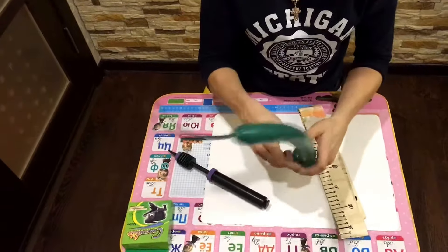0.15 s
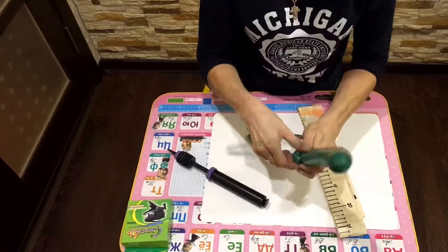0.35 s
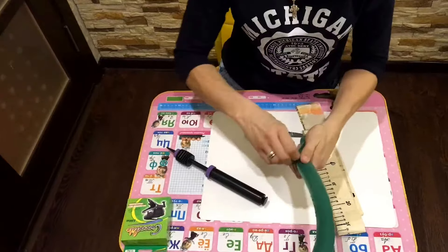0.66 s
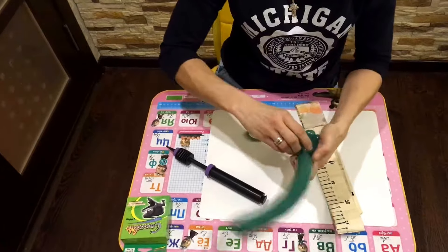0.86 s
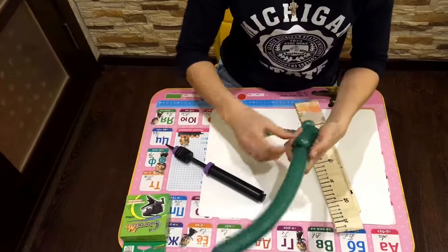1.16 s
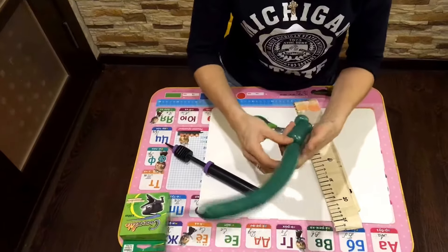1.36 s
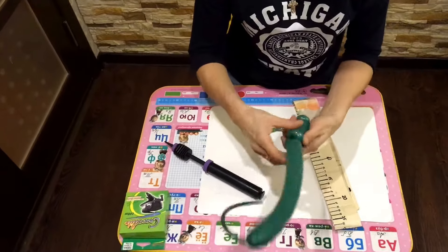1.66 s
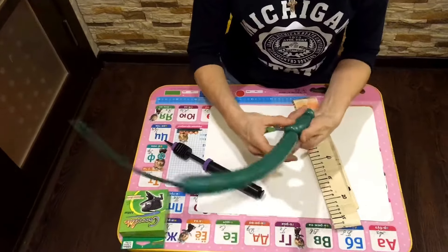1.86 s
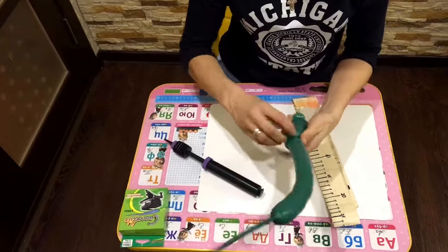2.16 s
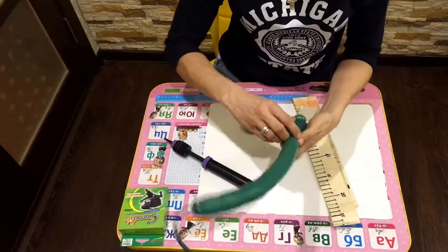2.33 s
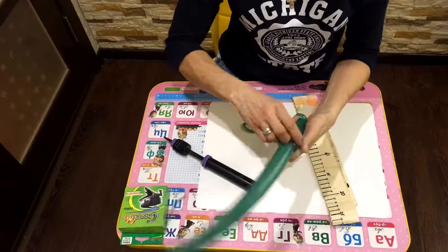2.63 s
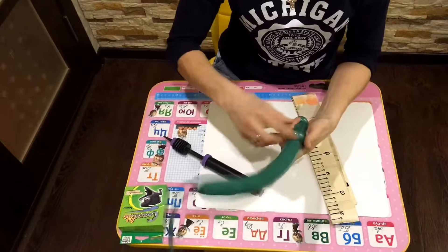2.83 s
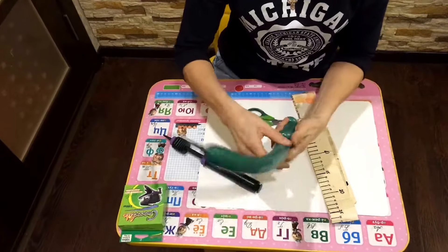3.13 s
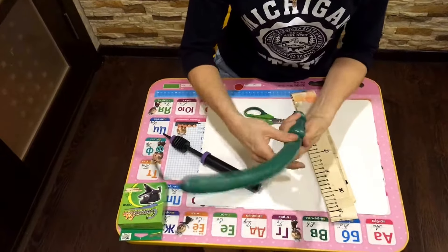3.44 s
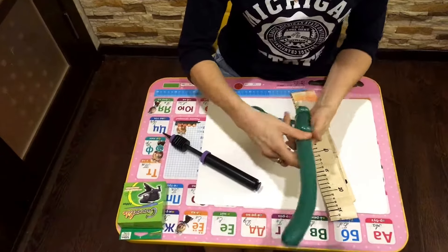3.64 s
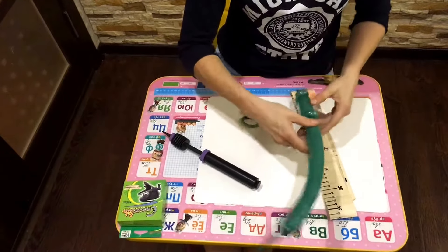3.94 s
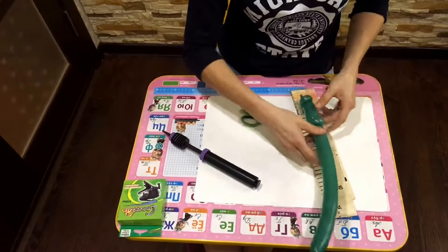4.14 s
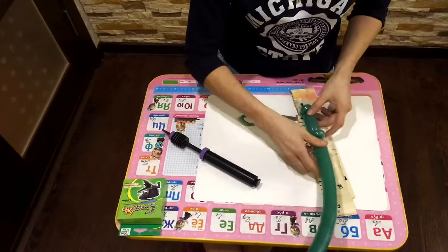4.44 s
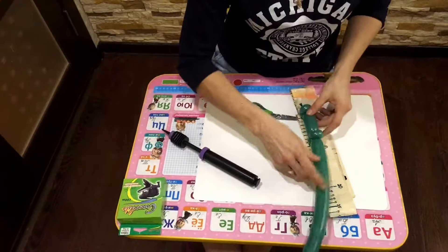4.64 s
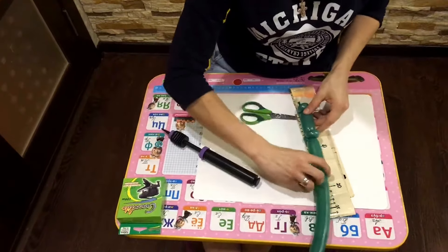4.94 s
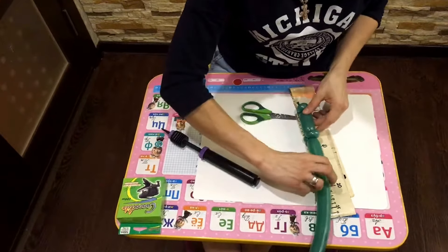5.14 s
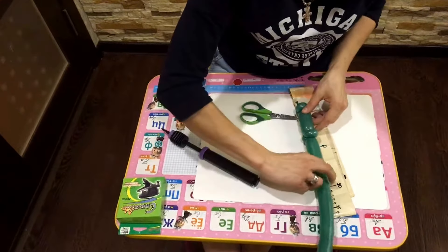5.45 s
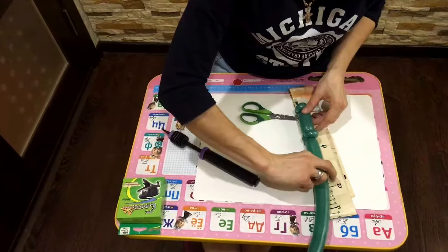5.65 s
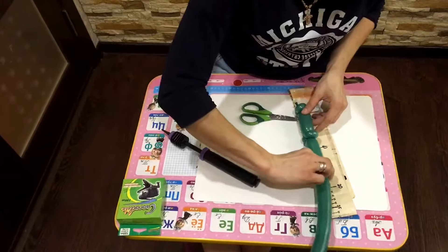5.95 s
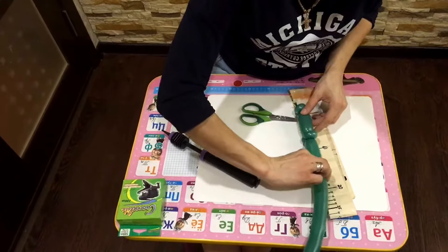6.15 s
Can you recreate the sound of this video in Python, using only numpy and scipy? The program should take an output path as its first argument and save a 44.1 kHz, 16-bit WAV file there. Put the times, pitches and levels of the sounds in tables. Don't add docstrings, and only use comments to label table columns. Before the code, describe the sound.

Close handling of an inflated rubber tube: uneven squeaky hiss, crisp latex snaps and small hollow pops, mixed with soft wooden thuds and a slight metallic ring. The first half is busy and sharp, with a rapid ratcheting creak before the middle. After about four seconds it becomes much quieter, with gentle finger strokes, little ticks and thin peeps near the end. Short indoor echo and low room murmur.

```python
import sys
import numpy as np
from scipy import signal
from scipy.fft import rfft, irfft
from scipy.io import wavfile
from scipy.ndimage import uniform_filter1d

SR = 44100
rng = np.random.default_rng(int(sys.argv[2]) if len(sys.argv) > 2 else 0)


def gain_from_decibels(decibels):
    exponent = np.asarray(decibels, float) / 20
    return 10 ** exponent


def wav_record(signal):
    frames = np.transpose(np.atleast_2d(signal))
    bounded = np.clip(frames, -1, 1)
    quanta = np.round(bounded * 32767).astype(np.int16)
    wavfile.write(sys.argv[1], SR, quanta)


N = 277389
ROOM_DB = -1


def rms_one(x):
    return x / np.sqrt(np.mean(x ** 2) + 1e-20)


def peak_one(x):
    return x / np.abs(x).max()


def in_time(rows):
    s, *columns = np.transpose(rows)
    return [np.interp(np.arange(N) / SR, s, c) for c in columns]


def coloured(x, spectrum):
    hz, db = np.transpose(spectrum)
    grid_hz = np.linspace(1, SR / 2, 2049)
    log_gain = np.interp(np.log(grid_hz), np.log(hz), db) * np.log(10) / 20
    cepstrum = irfft(log_gain)
    cepstrum[1:2048] *= 2
    cepstrum[2049:] = 0
    impulse = irfft(np.exp(rfft(cepstrum)))
    return signal.oaconvolve(x, impulse)[:len(x)]


def resonance(x, hz, width_hz):
    r = np.exp(-np.pi * width_hz / SR)
    top = np.array([1, 0, -1]) * (1 - r * r) / 2
    return signal.lfilter(top, [1, -2 * r * np.cos(2 * np.pi * hz / SR), r * r], x)


def drift(rate_hz):
    r = np.exp(-2 * np.pi * rate_hz / SR)
    return rms_one(signal.lfilter([1], [1, -2 * r, r * r], rng.standard_normal(N + SR))[SR:])


def burst(noise, rise_s, decay_s):
    t = np.arange(len(noise)) / SR
    return noise * (1 - np.exp(-t / rise_s)) * np.exp(-t / decay_s)


def add(out, s, piece):
    i = round(s * SR)
    out[i:i + len(piece)] += piece[:N - i]


def swells(s, db, rise_s, rest_db):
    out, t = np.full(N, float(rest_db)), np.arange(N) / SR
    fade_share = .9
    for at, top_db, rise in zip(s, db, np.maximum(rise_s, .01)):
        away_s = np.maximum(at - t, (t - at) / fade_share)
        out = np.maximum(out, top_db - 10 * away_s / rise)
    return out


def heard(piece, colour, wet_db):
    room_t60_s, treble_t60_s = 0.35, 0.16
    t = np.arange(round(.3 * SR)) / SR
    grit = signal.lfilter([.08], [1, -.96], rng.standard_normal(len(t)))
    scatter = rng.standard_normal(len(t)) * gain_from_decibels(6.7 * grit)
    low = signal.lfilter([.4], [1, -.6], scatter)
    echo = low * gain_from_decibels(-60 * t / room_t60_s) + (scatter - low) * gain_from_decibels(-60 * t / treble_t60_s)
    echo *= np.clip(t / 0.0026 - .5, 0, 1)
    wet = signal.fftconvolve(colour, echo)
    wet *= gain_from_decibels(wet_db) * np.linalg.norm(piece) / np.linalg.norm(wet)
    wet[:len(piece)] += piece
    return wet


# frequency in Hz, level in dB per Hz.
AIR = [(15, -65.5), (25, -25.5), (48, 3.5), (82, -11.5), (229, 0), (270, -37), (363, -16.5), (427, -20.5),
       (545, -44), (2840, -29), (16000, -25)]


def still_air():
    air_db = -71 - 1.0
    return gain_from_decibels(air_db) * rms_one(coloured(rng.standard_normal(N + 4096), AIR)[4096:])


# frequency in Hz, level in dB per Hz.
SKIN = [(500, -43.5), (1200, -14.5), (2000, -3), (3200, 0.5), (5000, 2), (9000, -1.5), (12000, -2.5),
        (16000, -9.5)]


def skin(x):
    return rms_one(coloured(x, SKIN))


# frequency in Hz, width in Hz, level in dB.
BOARD = [(150, 37, 2), (216, 31, 5.5), (273.2, 21.3, 7.5), (358, 54, -8.5), (567, 320, -18.5)]


def board(x):
    return sum(gain_from_decibels(db) * resonance(x, hz, width_hz) for hz, width_hz, db in BOARD)


def grains(per_s, spread_db, smooth):
    sizes = gain_from_decibels(spread_db * np.minimum(rng.exponential(1, N), 4)) * rng.standard_normal(N)
    born = rng.random(N) < per_s * gain_from_decibels(5.0 * drift(40)) / SR
    return rms_one(rms_one(sizes * born) + smooth * rng.standard_normal(N))


# peak time in seconds, level in dB, balloon body re hiss in dB,
# time to swell by 10 dB in seconds.
TURNS = [(0.0, -59, 9.5, 0.04), (.19, -48, -20, 0.17), (.31, -51.5, -5, 0.25), (.46, -47.5, -22.5, 0.16),
         (.79, -45, -23, 0.07), (.91, -51, -0.5, 0.09), (1.02, -57.5, 0.5, 0.13),
         (1.185, -34.5, -7.5, 0.0054), (1.242, -48.5, -3, 0.05), (1.47, -59, 4, -0.24),
         (1.59, -65.5, 7.5, 0.17), (1.79, -60.5, -1.5, 0.3), (1.91, -43, -10.5, 0.0765),
         (2.12, -69, 17, 0.04), (2.31, -50.5, -11, 0.1), (2.491, -38, -3, 0.0482), (2.59, -48.5, -8, 0.07),
         (2.906, -54, -1.5, 0.07), (3.26, -61, -12, 0.06), (3.38, -69, -0.5, 0.8), (3.436, -47, 0, 0.0337),
         (3.48, -49, -8.5, 0.12), (3.638, -53, -2.5, 0.04), (3.73, -69, 15.5, 0.07), (4.14, -76.5, 13, 0.3),
         (4.75, -61.5, -0.5, 0.12), (5.04, -58, -8, -0.1), (5.19, -56.5, 3, 0.23), (5.21, -52, 5, 0.01),
         (5.356, -55, 10.5, 0.03), (5.55, -59.5, 3.5, 0.11), (5.658, -51, -1, -0.04),
         (5.726, -48.5, -1, -0.05), (5.762, -48, -2, -0.05), (5.99, -71, 4, -0.83)]
# start in seconds, length in seconds, level in dB,
# balloon body re hiss in dB.
STROKES = [(0.719, 0.12, -42.5, -30), (1.153, 0.079, -42, -12), (2.028, 0.011, -45.5, -15),
           (2.661, 0.11, -46.5, -2), (3.855, 0.0082, -67, 13.5), (4.004, 0.13, -56.5, -9),
           (4.495, 0.06, -63.5, -3), (4.838, 0.068, -60, 2.5), (5.037, 0.018, -60.5, 6.5),
           (5.062, 0.011, -57, 9), (5.196, 0.011, -53, 5), (5.311, 0.064, -60.5, 13),
           (5.399, 0.015, -58.5, 9), (5.44, 0.032, -56, 5.5), (5.502, 0.021, -55, 2.5),
           (5.632, 0.032, -50.5, -0.5), (5.71, 0.029, -53.5, 2), (5.746, 0.012, -52.5, 3),
           (5.791, 0.0087, -55, 7.5), (5.888, 0.014, -62, 6.5), (5.945, 0.026, -67, 6.5),
           (6.244, 0.051, -73, 6.5)]


def hand_levels():
    rest_db, grip_s = -92.5, .005
    s, level_db, rel_db, rise_s = np.transpose(TURNS)
    hiss_db = swells(s, level_db, rise_s, rest_db)
    body_db = swells(s, level_db + rel_db, rise_s, rest_db + 15.5)
    for s, length_s, level_db, rel_db in STROKES:
        t = np.arange(N) / SR - s
        grip_db = 20 * np.log10(np.clip(t / grip_s, 1e-4, 1))
        shape_db = level_db + grip_db - 260 * np.clip(t - length_s, 0, 1)
        hiss_db = np.maximum(hiss_db, shape_db)
        body_db = np.maximum(body_db, shape_db + rel_db)
    return hiss_db, body_db


# frequency in Hz, level in dB per Hz.
BODY = [(250, -14.5), (500, 2), (1100, 3), (2000, 3.5), (4000, 1), (8000, -14)]
# frequency in Hz, width in Hz, level in dB.
CAVITY = [(326, 52, 0), (624, 3.3, 6.5), (1170, 36, -2), (1490, 12, -6), (1908, 33, -0.5), (2220, 17, -3),
          (3130, 68, -4), (3590, 47, -3), (3960, 65, -6.5), (4440, 60, -4), (5840, 50, -2.5)]


def rubbing(flicker_db):
    hiss_db, body_db = hand_levels()
    rasp = grains(3000, spread_db=2.5, smooth=1.2)
    patches = np.zeros(N)
    for hz in np.geomspace(2050, 8500, 7):
        wander = gain_from_decibels(5.5 * drift(4.35))
        patches += resonance(rasp, hz, 0.17 * hz) * wander / np.sqrt(hz)
    hiss = rms_one(skin(rasp) + 1.4 * rms_one(patches))
    rough = grains(1100, spread_db=-11.0, smooth=3.0)
    cavity = np.zeros(N)
    for hz, width_hz, db in CAVITY:
        cavity += gain_from_decibels(db + 2 * drift(8)) * resonance(rough, hz, 1.5 * width_hz)
    body = rms_one(rms_one(coloured(rough, BODY)) + 0.69 * rms_one(cavity))
    return hiss * gain_from_decibels(hiss_db + flicker_db) + body * gain_from_decibels(body_db + flicker_db)


# time in seconds, level in dB.
WEIGHT = [(0.0, -59.5), (.46, -72), (.72, -69), (.91, -63), (1.07, -64.5), (1.24, -67), (1.53, -55.5),
          (1.95, -71), (2.35, -58), (2.59, -70), (2.85, -57), (3.26, -73.5), (3.85, -58.5), (4.05, -72),
          (4.65, -62.5), (5.19, -77), (5.75, -65), (6.29, -73)]
# time in seconds, level in dB.
SHOVES = [
    (.19, -58),
    (1.27, -57),
    (1.55, -64),
    (2.01, -69),
    (2.31, -65),
    (2.98, -61),
    (3.59, -60),
    (4.73, -60),
    (5.69, -69),
]


def table_rumble(flicker_db):
    (board_db,) = in_time(WEIGHT)
    shove_s, legs_rest_db = 0.1, -77.5
    legs_db = swells(*np.transpose(SHOVES), [shove_s] * len(SHOVES), legs_rest_db)
    push = rng.standard_normal(N)
    legs = rms_one(resonance(resonance(push, 83, 87), 83, 87))
    top = rms_one(board(push)) * gain_from_decibels(board_db + 1.9 * flicker_db)
    return top + legs * gain_from_decibels(legs_db + 1.7 * flicker_db)


# start in seconds, peak in dB, centre in Hz, metal re tap in dB.
TAPS = [(.001, -39.5, 930, -20), (.295, -38.5, 970, -20), (.547, -45, 1490, 15), (1.126, -39, 1240, 2),
        (1.184, -28, 530, -0.5), (1.403, -46.5, 770, 6), (1.418, -48, 1500, -21), (1.435, -34.5, 850, -18),
        (1.608, -48, 1200, -21), (1.489, -29.5, 1120, -5), (1.817, -40.5, 1410, -20),
        (2.045, -39.5, 1400, -22), (2.082, -32.5, 1460, -4), (2.154, -29.5, 580, -33),
        (2.36, -38.5, 1390, -19.5), (2.665, -48, 1480, -11), (3.559, -44.5, 770, 7), (3.77, -41.5, 557, 5),
        (3.858, -36.5, 1640, -3), (4.04, -50, 1010, -2), (4.165, -44.5, 990, 1), (4.386, -49, 342, -2),
        (4.512, -50.5, 1230, 4), (4.64, -42, 290, -5), (4.693, -48.5, 1210, 11), (4.927, -39, 1210, -22),
        (5.205, -45.5, 624, -8), (5.755, -46, 1150, -21), (5.797, -41, 1300, -21), (5.848, -52, 1400, -21),
        (3.655, -52, 710, -19), (0.147, -46, 1390, -21)]
# start in seconds, peak in dB, centre in Hz, metal re knock in dB.
KNOCKS = [(.191, -36.5, 670, -33.5), (0.697, -50, 1420, -16), (.874, -30, 1310, 1.5),
          (1.569, -44, 1150, -18), (1.868, -32, 1550, 3), (1.925, -36.5, 1290, -11), (2.272, -38, 960, -35),
          (3.035, -35, 1630, 0), (3.15, -45, 377, 1), (3.413, -39, 1110, 11), (3.678, -39, 890, 7),
          (3.717, -29, 1490, -24), (4.574, -46, 554, 6.5), (4.846, -43.5, 468, 6.5),
          (5.511, -41.5, 1180, 6), (5.801, -55, 1170, -7)]
# frequency in Hz, level in dB, t60 in seconds.
METAL = [(1917, 2.5, 0.21), (2014, 9.5, 0.13), (3560, -7, 0.233)]


def knocks():
    knock_thud_db, tap_thud_db = -11.5, -26
    rows = [(*row, knock_thud_db) for row in KNOCKS] + [(*row, tap_thud_db) for row in TAPS]
    out, t = np.zeros(N), np.arange(12000) / SR
    ring = sum(gain_from_decibels(db - 60 * t / t60_s) * np.sin(2 * np.pi * hz * t) for hz, db, t60_s in METAL)
    ring *= 1 - np.exp(-t / 0.031)
    soft = signal.butter(1, 1500, fs=SR)
    for s, peak_db, hz, metal_db, thud_db in rows:
        tap = burst(rng.standard_normal(12000), rise_s=.0006, decay_s=.007)
        pair = np.array([tap[:2000], np.eye(1, 2000)[0]])
        contact = resonance(pair, hz, .5 * hz) + .33 * resonance(pair, 1100, 1200)
        dull, colour = signal.lfilter(*soft, contact)
        add(out, s, gain_from_decibels(peak_db) * heard(peak_one(dull), colour, ROOM_DB - 0.5))
        add(out, s, gain_from_decibels(peak_db + thud_db) * peak_one(board(tap)))
        add(out, s, gain_from_decibels(peak_db + metal_db - 14.5) * ring)
    return out


# start in seconds, frequency in Hz, peak in dB, t60 in seconds.
HUMS = [(.192, 195, -49.5, .32), (.875, 273, -47.5, .4), (1.185, 385, -36, .13), (1.215, 145, -51, .7),
        (1.215, 554, -53, .55), (1.22, 290, -52, .5), (1.501, 219.5, -54, .55), (3.809, 273, -53.5, .73),
        (4.659, 148, -49, .46), (1.191, 2005, -46, .27), (4.645, 1895, -56, .55), (4.65, 3634, -62, .9),
        (4.65, 4511, -67, .45), (4.06, 1943, -61, .6), (4.167, 1104, -56, .09), (4.142, 1104, -60, .08),
        (4.508, 1230, -59, .12), (4.928, 1450, -53, .13), (4.93, 380, -50, .09), (4.93, 700, -55, .09),
        (4.853, 1917, -54, .3), (3.316, 1530, -58, .2), (3.316, 3050, -59, .25), (3.316, 4650, -63, .15),
        (3.342, 1990, -58, .1), (3.354, 1990, -56, .2), (3.037, 1680, -50, .25), (3.718, 1442, -45, .2),
        (3.718, 1232, -47, .2), (1.49, 1232, -46, .15), (3.43, 2130, -45, .2), (2.156, 520, -45, .15)]


def hums():
    out, t = np.zeros(N), np.arange(12000) / SR
    for s, hz, peak_db, t60_s in HUMS:
        shiver = uniform_filter1d(rng.standard_normal(12000), size=500)
        waver_db = 3 * rms_one(uniform_filter1d(shiver, size=500))
        tone = np.sin(2 * np.pi * hz * t) * (1 - np.exp(-t / 0.0014))
        add(out, s, gain_from_decibels(peak_db - 60 * t / t60_s + waver_db) * tone)
    return out


# start in seconds, peak in dB, centre in Hz.
TICKS = [(0.0266, -30.5, 3560), (.0564, -35.5, 6550), (.181, -39, 4440), (0.274, -38, 6630),
         (0.341, -34, 7900), (.4156, -43, 4000), (.4505, -38, 6500), (0.494, -32, 6800),
         (0.7055, -23, 11000), (.833, -28, 8600), (0.846, -30, 8400), (.9453, -28.5, 11400),
         (1.104, -31, 5440), (1.152, -32.5, 4900), (1.3552, -43, 7100), (1.6079, -46, 3450),
         (1.8, -38, 7000), (1.8377, -38, 4740), (2.013, -35, 6720), (2.2913, -42, 5340),
         (2.3099, -33, 8100), (2.367, -29, 8180), (2.3873, -32, 6650), (2.401, -27, 6700),
         (2.4295, -23, 6560), (2.437, -25, 5570), (2.4445, -20.5, 6100), (2.4557, -20.5, 5430),
         (2.4717, -19, 7450), (2.4835, -22, 5550), (2.4945, -28, 5800), (2.7051, -32, 4390),
         (2.713, -31, 3000), (2.889, -34.5, 6650), (3.0635, -37, 5200), (3.1069, -44, 3700),
         (3.1922, -43, 3770), (3.526, -35, 8960), (3.599, -36, 8500), (3.611, -36, 8000),
         (3.6305, -35, 6650), (3.744, -30, 5500), (3.8142, -39, 6370), (4.1648, -47, 3270),
         (4.332, -53, 3700), (4.4212, -53, 4050), (5.0718, -36, 2950), (5.31, -38.5, 2900),
         (5.444, -38, 3900), (5.72, -36, 4600), (5.804, -35, 5800)]
# start in seconds, peak in dB, centre in Hz, creeping aftermath in dB.
SLIPS = [(.1145, -18.5, 8900, -3), (.3611, -23.5, 3270, -0.5), (.5504, -23.5, 5600, 8.5),
         (.6044, -20, 5500, 4.5), (.7034, -14.5, 8850, 2.5), (1.2087, -27, 4000, -3),
         (1.401, -47, 4220, 12), (1.4192, -32.5, 4440, 4.5), (2.0445, -36, 3560, 8),
         (2.0598, -19.5, 3730, 2.5), (2.155, -22.5, 2690, -1), (2.2845, -29, 3860, 8),
         (2.6372, -38.5, 3770, 13), (2.7774, -26, 5800, 3), (3.1725, -28, 6660, 1.5),
         (3.2205, -34.5, 3940, -2), (3.3806, -37, 6300, -12), (3.5596, -29, 5030, 3),
         (4.5756, -43, 3720, 7.5), (5.7999, -32, 4970, 0.5)]
# start in seconds, peak in dB, centre in Hz, aftermath in dB.
PLUCKS = [(.2657, -30, 9400, -15), (.404, -26.5, 3900, 5.5), (.4313, -27, 5880, -25),
          (.6304, -26, 7410, -2), (.8741, -21, 2550, 1), (1.054, -30.5, 4960, 0.5), (1.1628, -40, 4580, 18),
          (1.4935, -33, 3680, 7.5), (1.7679, -35.5, 8900, -8), (1.8143, -39.5, 4170, 4),
          (2.358, -27, 6300, 3), (2.379, -22.5, 6600, 4.5), (2.6558, -25.5, 6800, -4),
          (2.7258, -25.5, 4200, 5.5), (2.8453, -34, 3400, 5.5), (3.7163, -19.5, 3620, 3.5),
          (4.8474, -43.5, 4180, 6), (4.9269, -51.5, 2900, 17)]
# start in seconds, peak in dB, centre in Hz, aftermath in dB.
SNAPS = [(0.4795, -21, 4080, -7), (0.5393, -22, 5000, -1.5), (0.5449, -10, 8100, 0.5),
         (.5815, -7.5, 7850, -1.5), (0.595, -32, 9120, -18), (0.669, -17.5, 4400, 1),
         (0.7382, -23, 8450, -8), (0.7925, -17.5, 8500, 1.5), (1.0974, -23.5, 6700, 4.5),
         (1.6979, -30.5, 3920, -1.5), (1.8181, -24.5, 8970, 2.5), (1.8686, -7, 6180, 0),
         (2.509, -14, 9500, -1), (2.514, -29, 5800, -0.5), (2.52, -16.5, 6300, 1.5),
         (2.6667, -21, 3080, -7.5), (2.74, -24.5, 3740, 0), (3.3998, -22.5, 3330, 5),
         (3.414, -10.5, 4360, 1.5), (4.6418, -34, 3750, 2.5), (5.51, -34.5, 4200, 3)]
# start in seconds, peak in dB, centre in Hz, aftermath in dB.
POPS = [
    (3.0358, -34.5, 3900, 1.5),
    (3.8605, -43.5, 2850, -6),
    (4.3888, -61.5, 2610, 13.5),
    (5.0685, -44.5, 3990, 4),
]


def releases():
    broad_ring, tick_ring, tick_after_db, tick_body_db = 0.44, 1.1, -5.5, -27
    rows = [(*row, tick_after_db, tick_body_db, tick_ring) for row in TICKS]
    for kind, body_db in [(SNAPS, -32), (SLIPS, -10.5), (PLUCKS, -1.5), (POPS, 10.5)]:
        rows += [(*row, body_db, broad_ring) for row in kind]
    return rows


def slips():
    out, click = np.zeros(N), np.eye(1, 1024)[0]
    for s, peak_db, hz, creep_db, body_db, ring in releases():
        scrap = rng.standard_normal(1024)
        uneven = scrap * gain_from_decibels(3.64 * scrap[::-1])
        crack = burst(uneven, rise_s=0.0005, decay_s=0.0012)
        crack[20] += 1.4 * np.abs(crack).max()
        voices = []
        for x in (crack, click):
            patch = rms_one(resonance(resonance(x, hz, .5 * hz), hz, .5 * hz))
            tube = rms_one(resonance(x, 1671, 1600))
            bright = skin(x) + ring * patch
            voices.append((bright, bright + gain_from_decibels(body_db) * tube))
        (bright, direct), (_, colour) = voices
        direct = direct / np.abs(bright).max()
        add(out, s, gain_from_decibels(peak_db - 2.0) * heard(direct, colour, ROOM_DB + creep_db))
    return out


# time in seconds, pitch in Hz, level in dB.
SQUEAKS = [
    [(3.312, 771, -93), (3.318, 780, -56), (3.326, 836, -50.5), (3.337, 1010, -53), (3.35, 855, -55),
     (3.362, 700, -52.5), (3.37, 617, -71)],
    [(5.745, 1150, -72), (5.756, 1196, -57), (5.78, 1095, -54), (5.803, 1294, -54), (5.825, 1396, -56.5),
     (5.86, 1420, -72)],
    [(6.25, 1640, -83.5), (6.265, 1694, -60.5), (6.285, 1640, -60)],
]
# pitch wobble as a share, overtones in dB, flutter in dB.
SQUEAK_TONE = [
    (.015, -4, 2),
    (.2, -18, 6),
    (.01, -30, 2),
]
# multiple of the pitch, level in dB.
SQUEAK_PARTIALS = [(1, 0), (2, -4), (3, -18), (4, -18), (5, -24)]


def squeaks():
    out = np.zeros(N)
    for rows, (wobble, overtones_db, flutter_db) in zip(SQUEAKS, SQUEAK_TONE):
        before = (rows[0][0] - .002, rows[0][1], -130)
        after = (rows[-1][0] + .002, rows[-1][1], -130)
        hz, level_db = in_time([before, *rows, after])
        phase = 2 * np.pi * np.cumsum(hz * (1 + wobble * drift(130))) / SR
        tone = sum(gain_from_decibels(db + overtones_db * (k > 1)) * np.sin(k * phase) for k, db in SQUEAK_PARTIALS)
        out += gain_from_decibels(level_db + flutter_db * drift(80)) * tone
    return heard(out, out, wet_db=-8)[:N]


def scene():
    flicker_db = 1.3 * drift(25)
    friction = rubbing(flicker_db) + table_rumble(flicker_db)
    return (still_air() + friction + knocks() + hums() + slips() + squeaks())[None]


def top_cut(x):
    return signal.sosfilt(signal.butter(12, 16640, fs=SR, output="sos"), x)


def record(dry):
    port = dry - 0.8 * resonance(dry, 10440, width_hz=340)
    steep = signal.ellip(8, .5, 27, 15250, fs=SR, output="sos")
    return top_cut(signal.sosfilt(steep, port))


dry = scene()
out = record(dry)
wav_record(out)
```